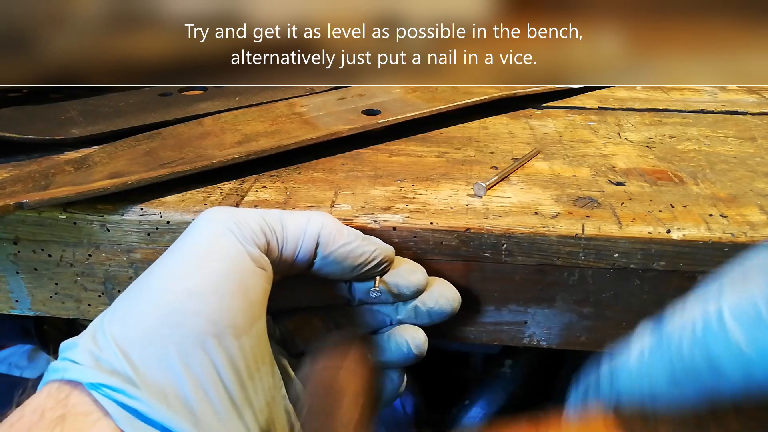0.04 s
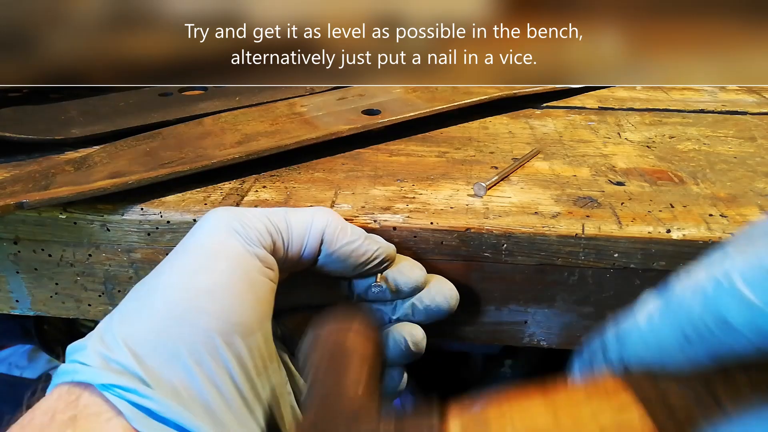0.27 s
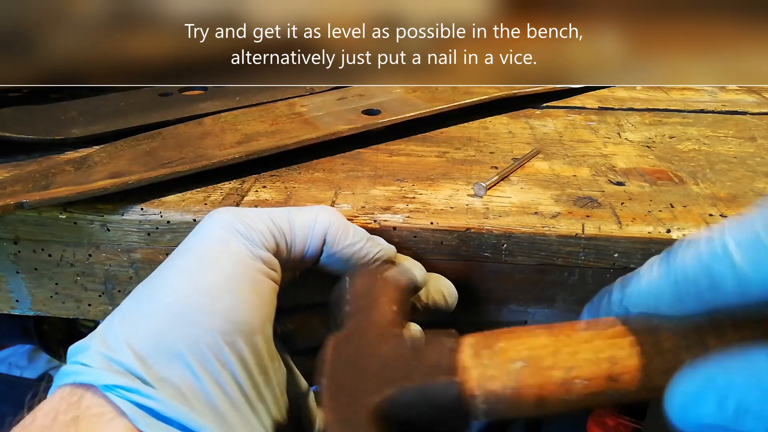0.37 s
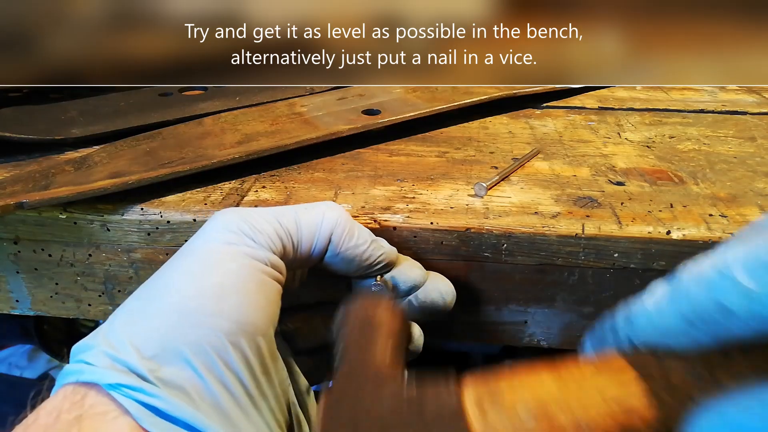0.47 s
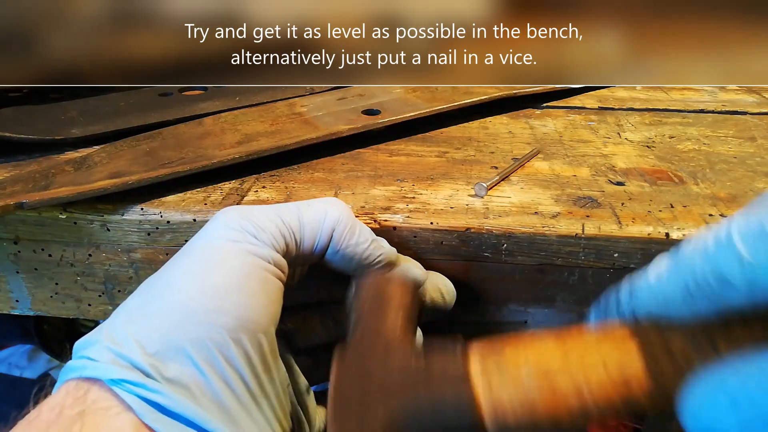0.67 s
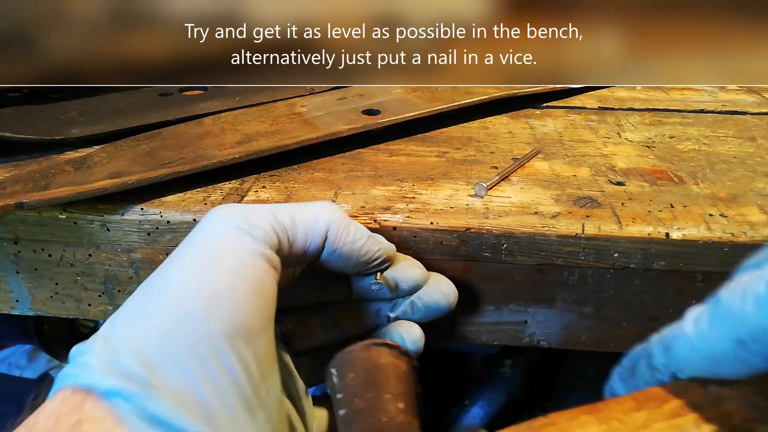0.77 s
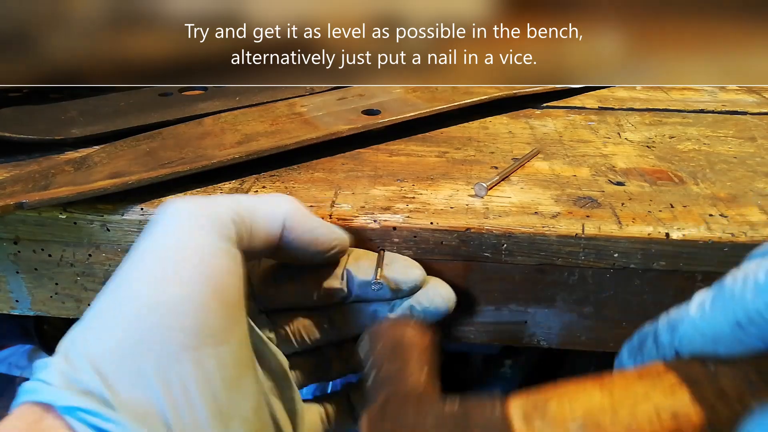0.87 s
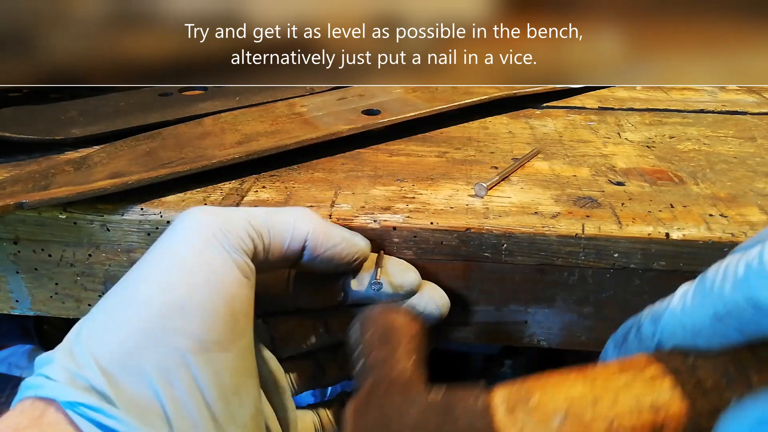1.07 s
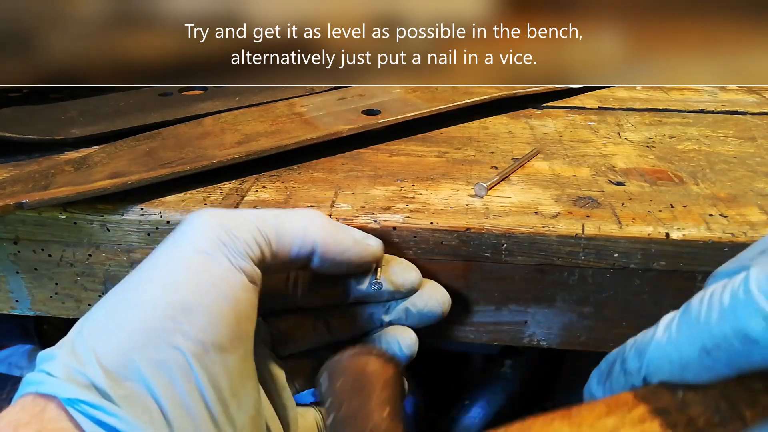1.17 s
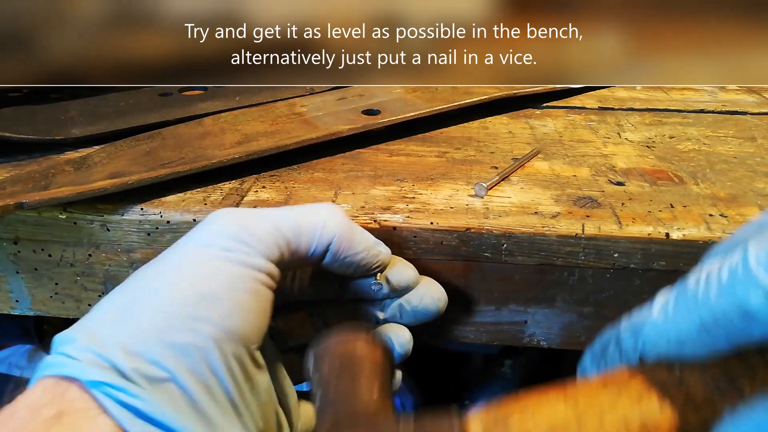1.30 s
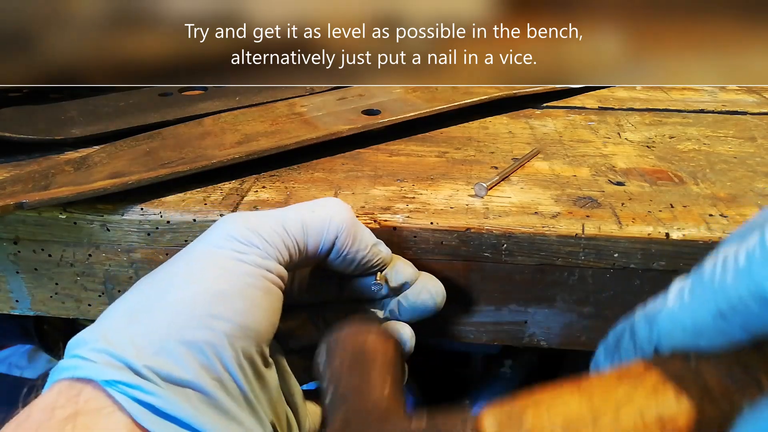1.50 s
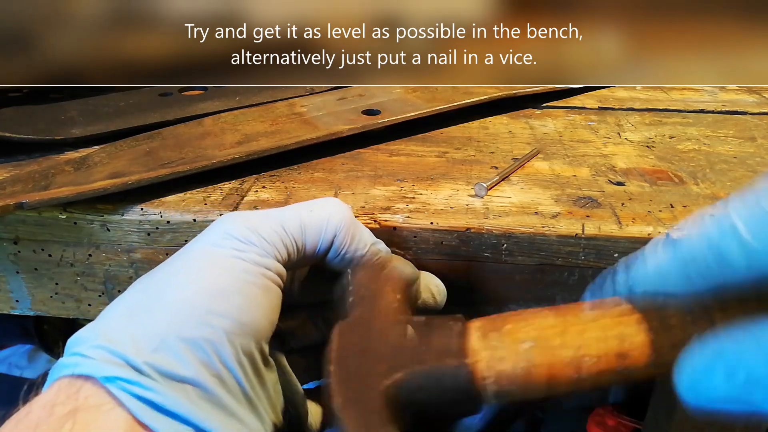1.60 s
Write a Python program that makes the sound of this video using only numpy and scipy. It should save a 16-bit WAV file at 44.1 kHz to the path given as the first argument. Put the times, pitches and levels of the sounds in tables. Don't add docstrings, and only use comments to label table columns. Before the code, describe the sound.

Close stereo pickup of four evenly spaced hammer blows on a nail, the first lighter, the later ones fuller and woodier, with brief room echo and faint metallic ringing, followed by quiet glove rustle over soft hiss.

```python
import sys
import numpy as np
from scipy import signal
from scipy.fft import rfft, irfft
from scipy.io import wavfile
from scipy.ndimage import uniform_filter1d

SR = 44100
rng = np.random.default_rng(int(sys.argv[2]) if len(sys.argv) > 2 else 0)


def magnitude_from_level(level_db):
    exponent = np.asarray(level_db, float) / 20
    return 10 ** exponent


def wav_out(sig):
    wavfile.write(sys.argv[1], SR, np.round(np.clip(np.atleast_2d(sig).T, -1, 1) * 32767).astype(np.int16))


N = 72765
LEAD = 2048
M = N + LEAD
T = (np.arange(M) - LEAD) / SR


def table(points, hz):
    p = np.array(points, float)
    return np.interp(np.log(hz + 1), np.log(p[:, 0]), p[:, 1])


def colour(x, points):
    log_gain = table(points, np.fft.rfftfreq(4096, 1 / SR)) * np.log(10) / 20
    c = irfft(log_gain)
    c = np.concatenate([c[:1], 2 * c[1:2048], np.zeros(2048)])
    impulse = irfft(np.exp(rfft(c)))[:2048]
    return signal.fftconvolve(x, impulse)[:len(x)]


def unit(x):
    return x / np.sqrt(np.mean(x ** 2))


def clicks(times_s, levels_db):
    out = np.zeros(M)
    for s, db in zip(times_s, levels_db):
        k = int(s * SR) + LEAD + np.arange(-8, 9)
        d = (T[k] - s) * SR
        out[k] += magnitude_from_level(db) * np.sinc(d) * np.cos(np.pi * d / 18) ** 2
    return out


def fade(start_s, t60_s, rise_s):
    age_s = np.maximum(T - start_s, 0)
    return (1 - np.exp(-age_s / rise_s)) * magnitude_from_level(-60 * age_s / t60_s)


def bands():
    spec = rfft(rng.standard_normal((2, M)))
    f = np.fft.rfftfreq(M, 1 / SR) + 1
    for hz in 25 * 2 ** (np.arange(29) / 3):
        window = np.cos(np.clip(3 * np.log2(f / hz), -1, 1) * np.pi / 2) ** 2
        yield hz, irfft(spec * window, M)


def ports(pair, hz, side_hz):
    share = np.clip((hz / side_hz) ** 2, .2, 1)
    return np.array([pair[0], np.sqrt(1 - share) * pair[0] + np.sqrt(share) * pair[1]])


# frequency in Hz, level in dB per Hz.
AIR_SPECTRUM = [(60, -2), (110, -14), (210, -14), (600, -24.5), (1200, -19.5), (4000, -22.5), (9700, -22.5),
                (15800, -31.5)]
AIR_DB = -63.5


def air():
    out = 0
    for hz, pair in bands():
        out = out + magnitude_from_level(table(AIR_SPECTRUM, hz)) * ports(pair, hz, 450.0)
    return magnitude_from_level(AIR_DB) * unit(out)


STRIKE_S = [-.012, .2122, .4326, .6629]
REBOUND_S = [.016, .0140, .0166, .0168]
# level in dB, nail depth 0-1, rebound in dB, bench in dB.
FORCE = [
    (-6, 0.05, -22.5, 4.5),
    (3.5, 0, -25, -4),
    (2, 0.3, -16.5, 3.5),
    (2.5, 0.97, -15, 3.5),
]
# strike in s, rebound in s, then the row of FORCE.
BLOWS = [(s, s + after, *row) for s, after, row in zip(STRIKE_S, REBOUND_S, FORCE)]
# frequency in Hz, gain in dB.
SINK = [(200, 11.5), (1000, 15.5), (2800, 11), (5500, -3), (10000, 2), (16000, -4)]
# frequency in Hz, t60 in seconds.
ROOM_T60 = [(300, 0.36), (700, 0.3), (1840, 0.24), (4850, 0.25), (9000, 0.22), (14000, 0.13)]
# frequency in Hz, level in dB.
ROOM_COLOUR = [(90, -14), (200, 2.5), (500, -6), (1200, -6), (3000, -2.5), (9700, -8), (11500, -11.5),
               (15500, -20.5)]
ROOM_DB, ROOM_RISE_S = -21.5, 0.0023


def room():
    out = 0
    for hz, pair in bands():
        t60_s = table(ROOM_T60, hz)
        env = 0
        for strike_s, rebound_s, db, depth, rebound_db, _ in BLOWS:
            echo = fade(strike_s, t60_s, ROOM_RISE_S)
            echo = echo + magnitude_from_level(rebound_db - 7) * fade(rebound_s, t60_s, ROOM_RISE_S)
            env = env + magnitude_from_level(db + 0.55 * depth * table(SINK, hz)) * echo
        out = out + magnitude_from_level(ROOM_DB + table(ROOM_COLOUR, hz)) * env * ports(pair, hz, 400.0)
    return out


# start in s, rise in s, hold in s, fall t60 in s, level in dB.
RUSTLE = [
    (0.851, 0.016, 0.06, 0.11, -48),
    (0.926, 0.033, .08, 0.63, -65.5),
    (1.052, 0.0455, 0.055, 0.022, -52.5),
    (1.161, 0.013, 0.031, 0.16, -63),
    (1.217, 0.035, 0.085, 0.23, -70.5),
    (1.623, .03, 0.056, .1, -69),
]
# frequency in Hz, level in dB per Hz.
GLOVE_SPECTRUM = [(2500, -30), (4200, -13), (6000, -10), (8300, -4), (9900, 2), (11500, -11.5),
                  (15800, -15)]
# time in seconds, level in dB.
CREAKS = [(0.867, -44), (.912, -35.5), (.938, -50.5), (0.975, -52.5), (1.18, -44.5), (1.197, -57),
          (1.214, -50), (1.295, -65.5), (1.321, -50.5), (1.347, -50)]
GLOVE_DB, GRAINS_PER_S, GRAIN_SPREAD_DB, LAG_MS = 1.5, 8800, 3.5, .12


def glove():
    hits = rng.random(M) < GRAINS_PER_S / SR
    grains = hits * rng.standard_normal(M) * magnitude_from_level(GRAIN_SPREAD_DB * rng.exponential(size=M))
    env = 0
    for start_s, rise_s, hold_s, t60_s, db in RUSTLE:
        swell = np.clip((T - start_s) / rise_s, 0, 1) ** 2
        fall = magnitude_from_level(-60 * np.maximum(T - start_s - hold_s, 0) / t60_s)
        env = env + magnitude_from_level(GLOVE_DB + db) * swell * fall
    creaks = colour(clicks(*np.array(CREAKS).T), GLOVE_SPECTRUM)
    near = env * unit(colour(grains, GLOVE_SPECTRUM)) + magnitude_from_level(21.5) * creaks
    hiss = np.array([unit(colour(rng.standard_normal(M), GLOVE_SPECTRUM)) for _ in range(2)])
    far = magnitude_from_level(-2.5) * env * hiss
    right = magnitude_from_level(-2.5) * np.interp(T - LAG_MS / 1000, T, near)
    return np.array([near, right]) * .7 + far


HEAD_DB = [-65.5, -38, -41.5, -49]
HEAD_HZ, HEAD_LIFT_S, HEAD_T60_S, HEAD_RIGHT_DB = 9119, .04, 0.94, -19
GRIP_S, GRIP_T60_S = .87, .35
# frequency in Hz, t60 in seconds, left in dB, right in dB.
TOOLS = [
    (967, 1., -64, -65),
    (1873, .45, -54, -58),
    (1935, 2.6, -78, -65),
    (2713, .6, -56, -56),
    (5470, .8, -66, -61),
]
RATTLE_S = 0.016


def steel():
    out = np.zeros((2, M))
    wavers = []
    for _ in TOOLS:
        drift = uniform_filter1d(rng.standard_normal(M), int(RATTLE_S * SR))
        wavers.append(1 + .2 * unit(drift))
    grip_db = -60 * np.maximum(T - GRIP_S, 0) / GRIP_T60_S
    ends_s = STRIKE_S[1:] + [9]
    for (strike_s, _, db, depth, _, _), end_s, head_db in zip(BLOWS, ends_s, HEAD_DB):
        free = T < end_s
        head = np.sin(2 * np.pi * HEAD_HZ * (T - strike_s))
        head = magnitude_from_level(head_db + 5.5) * fade(strike_s, HEAD_T60_S, HEAD_LIFT_S) * head
        out += free * head * magnitude_from_level(grip_db + np.array([[0], [HEAD_RIGHT_DB]]))
        for (hz, t60_s, left_db, right_db), waver in zip(TOOLS, wavers):
            ring = free * waver * fade(strike_s, t60_s, 0.0018) * np.sin(2 * np.pi * hz * (T - strike_s))
            out += ring * magnitude_from_level(np.array([[left_db], [right_db]]) + db / 2 + 2 * depth)
    return out


# frequency in Hz, t60 in seconds.
BENCH_MODES = [(62, .25), (130, .3), (153, .28), (183, .2), (215, .18), (258, .2), (305, .15), (323, .13),
               (350, .18), (409, .25), (549, .15), (680, .09), (716, .11), (990, .09)]
# dB with nail high, dB with nail deep.
BENCH_MIX = [(-26.5, -27.5), (-10, -14), (-3, -1), (-8, -8.5), (-11.5, -11), (-10.5, -0.5), (-8.5, -0.5),
             (-17.5, 5), (-13.5, -16), (-20, -19.5), (-21, -16), (-14.5, -5), (-8.5, -8), (-17.5, -1.5)]
BENCH_DB, BENCH_SWELL_S, BENCH_REBOUND_DB = -28, 0.013, 10.5
BENCH_SIDE_HZ, BENCH_RIGHT_DB = 520, 6.5


def bench():
    out = np.zeros((2, M))
    for strike_s, rebound_s, db, depth, rebound_db, bench_db in BLOWS:
        for k, ((hz, t60_s), (high_db, deep_db)) in enumerate(zip(BENCH_MODES, BENCH_MIX)):
            apart = np.array([[0], [min(hz / BENCH_SIDE_HZ, 1) ** 4]])

            def ring(at_s):
                return (-1) ** k * np.sin(2 * np.pi * hz * (T - at_s) + 2.8 * apart)

            mode_db = high_db + depth * (deep_db - high_db) + BENCH_RIGHT_DB * apart
            first = fade(strike_s, t60_s, BENCH_SWELL_S * 200 / hz) * ring(strike_s)
            second = fade(rebound_s, t60_s, 0.0034) * ring(rebound_s)
            second = magnitude_from_level(rebound_db + BENCH_REBOUND_DB) * second
            out += magnitude_from_level(BENCH_DB + db + bench_db + mode_db) * (first + second)
    return out


# frequency in Hz, gain in dB.
CRACK_COLOUR = [
    [(90, -59.5), (900, -26.5), (2100, -3), (3300, -4.5), (5000, -3.5), (9700, 3), (11400, -9),
     (15500, -24.5)],
    [(90, -43.5), (900, -27), (2600, -4.5), (4500, -3), (6200, 0), (9500, -3), (11500, -9.5), (15500, -20)],
]
GLANCE_MS = [
    [0, .39, .59, .8, 1.0, 1.22, 1.88, 2.2],
    [.07, .61, .8, .93, 1.47, 1.79, 2.33, 3.1],
]
GLANCE_DB = [
    [0, -7, 0, -4, -3, -1, -6, -10],
    [0, 0, -4, -2, -8, -6, -9, -12],
]
# frequency in Hz, gain in dB.
REBOUND_COLOUR = [(3000, 2.5), (9000, -4.5)]
CRACK_DB, SPLINTER_DB, SPLINTER_T60_S = 6, -16, 0.017


def crack():
    out = np.zeros((2, M))
    for strike_s, rebound_s, db, depth, rebound_db, _ in BLOWS:
        sink = [(hz, depth * gain_db) for hz, gain_db in SINK]
        for c in range(2):
            lag_s = np.array(GLANCE_MS[c]) / 1000
            glance_db = np.array(GLANCE_DB[c])
            first = clicks(strike_s + lag_s, glance_db)
            second = colour(clicks(rebound_s + lag_s, glance_db + rebound_db), REBOUND_COLOUR)
            splinter = rng.standard_normal(M) * fade(strike_s, SPLINTER_T60_S, 0.00012)
            x = magnitude_from_level(SPLINTER_DB) * splinter - first - second
            out[c] += magnitude_from_level(db + CRACK_DB) * colour(colour(x, CRACK_COLOUR[c]), sink)
    return out


HUSH_DB, HUSH_FROM_S, HUSH_TO_S = -16, .014, .004
DUCK_DB, RECOVER_S = -1, .15


def scene():
    sag_db = sum(DUCK_DB * (T > s) * np.exp(-np.abs(T - s) / RECOVER_S) for s in STRIKE_S)
    hush = 0
    for k, s in enumerate(STRIKE_S[1:], 1):
        hush = hush + 1 / k * (T > s - HUSH_FROM_S / k) * (T < s - HUSH_TO_S)
    hush_db = HUSH_DB * uniform_filter1d(hush, size=90)
    background = magnitude_from_level(hush_db) * (room() + magnitude_from_level(sag_db) * air())
    return (background + glove() + steel() + bench() + crack())[:, LEAD:]


def low_pass(x):
    return signal.sosfilt(signal.butter(12, 16990, fs=SR, output="sos"), x)


# frequency in Hz, gain in dB.
TOP = [(15700, 0), (16100, -26), (17000, -36)]
CEILING = 1.6


def record(dry):
    rounded = CEILING * np.tanh(dry / CEILING)
    mix = np.array([colour(c, TOP) for c in rounded])
    return low_pass(mix)


dry = scene()
out = record(dry)
wav_out(out)
```